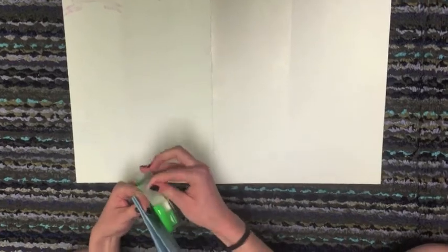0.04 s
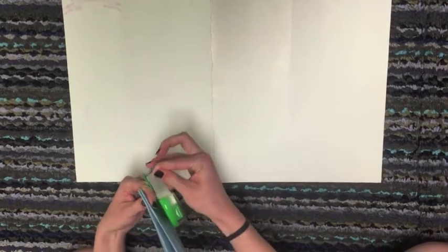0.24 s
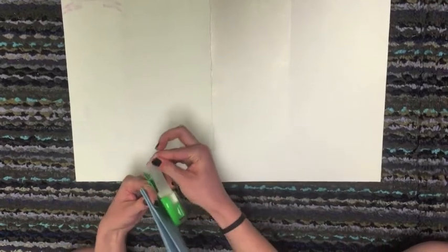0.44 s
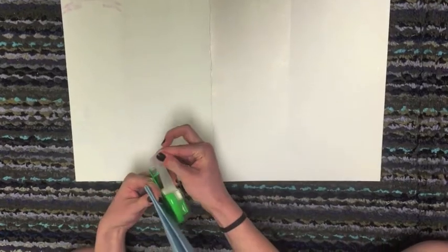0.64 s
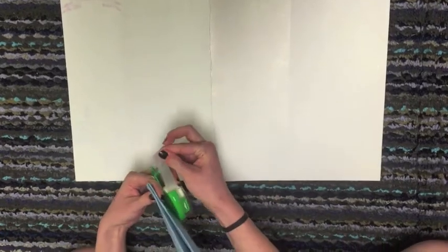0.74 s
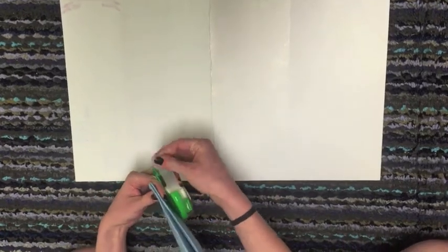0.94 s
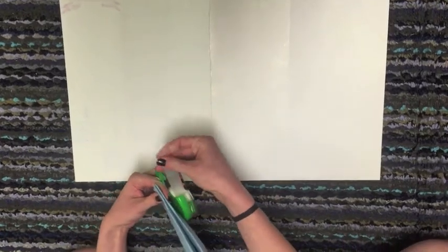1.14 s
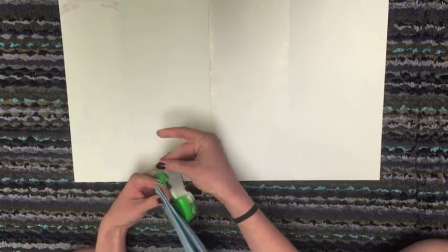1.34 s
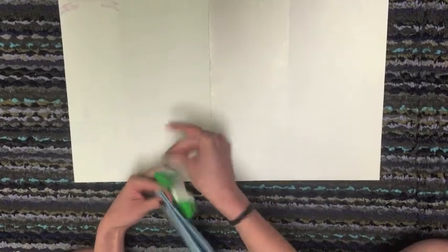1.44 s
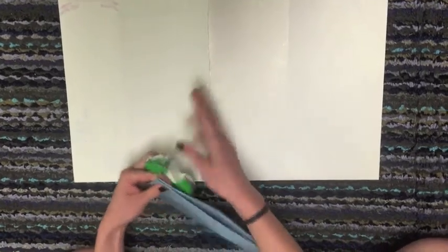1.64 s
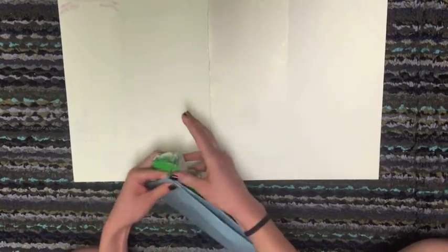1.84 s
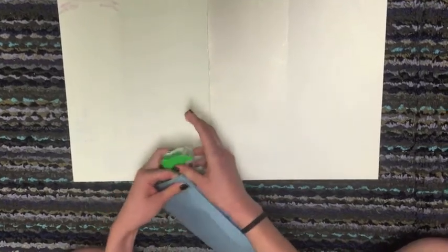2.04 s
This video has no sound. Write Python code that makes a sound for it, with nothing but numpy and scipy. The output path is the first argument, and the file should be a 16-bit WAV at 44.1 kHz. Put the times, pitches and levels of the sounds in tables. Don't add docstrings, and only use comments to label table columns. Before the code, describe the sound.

Adhesive tape lets go of its roll in sharp rattling jerks that ring a plastic shell briefly, then small ticks, a quick toothed rip and light paper handling, close-miked, with short room echo and low ventilation rumble.

```python
import sys
import numpy as np
from scipy import signal
from scipy.fft import rfft, irfft
from scipy.io import wavfile
from scipy.ndimage import map_coordinates

SR = 44100
rng = np.random.default_rng(int(sys.argv[2]) if len(sys.argv) > 2 else 0)


def voltage_ratio(level):
    return 10 ** (np.asarray(level, float) / 20)


def wav_out(sig):
    wavfile.write(sys.argv[1], SR, np.round(np.clip(np.atleast_2d(sig).T, -1, 1) * 32767).astype(np.int16))


N = 92610
LEAD = 4096


def rms_one(x):
    return x / np.sqrt(np.mean(x ** 2) + 1e-20)


def at_hz(points, hz):
    p = np.array(points)
    return np.interp(np.log(np.maximum(hz, 1)), np.log(p[:, 0]), p[:, 1])


def colour(x, points):
    hz = np.arange(len(x) // 2 + 1) * SR / len(x)
    return rms_one(irfft(rfft(x) * voltage_ratio(at_hz(points, hz)), len(x)))


def highpass(x, hz):
    return signal.sosfilt(signal.butter(3, hz, "high", fs=SR, output="sos"), x)


def ring(clicks, hz, t60):
    r = voltage_ratio(-60 / (t60 * SR))
    w = 2 * np.pi * hz / SR
    return signal.lfilter([0, np.sin(w)], [1, -2 * r * np.cos(w), r * r], clicks + 1e-18)


def drift(rate):
    knots = rng.standard_normal(200)
    return map_coordinates(knots, [np.arange(N) / SR * rate], order=3)


def crackle(per_s, spread_db):
    n = N + LEAD
    happens = rng.random(n) < per_s / SR
    size = voltage_ratio(spread_db * np.minimum(rng.exponential(1, n), 4))
    return happens * size * rng.choice([-1, 1], n)


def swells(rows):
    t = (np.arange(N + LEAD) - LEAD) / SR
    return sum(voltage_ratio(db) * np.exp(-((t - mid) / half) ** 2) for mid, half, db in rows)


# [t/s, level/dB]
AIR_FLOW = [(0.0, -54), (0.2, -60), (0.63, -59), (0.65, -70), (0.7, -54.5), (0.88, -64.5), (0.92, -54),
            (0.96, -66.5), (1.62, -55), (1.65, -67.5), (1.72, -56), (1.77, -65), (1.91, -57.5), (2.03, -68),
            (2.08, -56), (2.1, -59)]
# [f/Hz, level/dB per Hz]
RUMBLE_COLOUR = [(15, -54.5), (25, -26.5), (38, -12.5), (113, -1.5), (238, -13), (308, -12.5), (368, -28),
                 (681, -21.5), (1200, -28), (1560, -62), (2640, -120)]
# [f/Hz, width/Hz, level/dB]
DUCT_TONES = [(59, 8, -68), (82, 12, -72.5), (110, 9.2, -64), (159, 33, -72), (239, 20, -75.5),
              (305, 34, -69), (385, 25, -80), (680, 52, -79.5), (850, 50, -83.5)]
# [f/Hz, level/dB per Hz]
HISS_COLOUR = [(590, -36.5), (1000, -18), (1430, -3), (1550, -7), (1960, -8), (4210, -13), (13100, -19.5),
               (14900, -22.5), (16000, -38.5)]


def ventilation():
    s, flow_db = np.transpose(AIR_FLOW)
    gust_db = 0.8 * np.interp(np.arange(N) / SR, s, flow_db - flow_db.mean())
    air = colour(rng.standard_normal(N), list(RUMBLE_COLOUR)) * voltage_ratio(-65 + 2.0 * drift(11))
    for hz, width_hz, db in DUCT_TONES:
        tone = rms_one(ring(rng.standard_normal(N + SR), hz, 2.2 / width_hz)[SR:])
        follow_db = gust_db * min(1, 150 / hz)
        air += voltage_ratio(db + 3.0 * drift(7.94) + follow_db) * tone
    hiss = colour(rng.standard_normal(N), [(400, -58.5)] + list(HISS_COLOUR))
    return air + voltage_ratio(-75) * hiss


# [f/Hz, t/s]
ROOM_FADE = [(300, 0.16), (800, 0.25), (2100, .25), (5500, 0.24), (14600, 0.14)]
# [f/Hz, level/dB]
ROOM_TINT = [(200, 0.5), (700, 3), (1500, 1.5), (2500, 3), (4300, -4), (7000, -0.5), (15000, -7.5)]
# [delay t/s, level/dB]
NEAR_ECHOES = [(0.0119, -25.5), (.015, -24)]


def room(x):
    room_db, first_wall_s, build_s = -15, 0.00067, 0.0065
    t = np.arange(SR // 2) / SR
    edges = 150 * 2 ** np.arange(0, 7, .5)
    tail = 0
    for low, high in zip(edges, edges[1:]):
        hz = np.sqrt(low * high)
        sos = signal.butter(2, [low, high], "band", fs=SR, output="sos")
        band = signal.sosfilt(sos, rng.standard_normal(len(t)))
        tail = tail + band * voltage_ratio(at_hz(ROOM_TINT, hz) - 60 * t / at_hz(ROOM_FADE, hz))
    tail = tail * np.clip((t - first_wall_s) / build_s, 0, 1)
    tail *= voltage_ratio(room_db) / np.sqrt(np.sum(tail ** 2))
    for s, db in NEAR_ECHOES:
        tail[int(s * SR)] += voltage_ratio(db)
    return signal.fftconvolve(x, tail)[:len(x)]


# [middle t/s, half length t/s, level/dB]
PAPER_SLIDES = [
    (0.135, 0.014, -65),
    (0.182, 0.0052, -74.5),
    (1.044, 0.013, -72.5),
    (1.871, 0.015, -64),
    (1.965, 0.017, -70),
    (2.02, 0.027, -70.5),
    (1.45, 0.046, -74),
]
# [f/Hz, level/dB per Hz]
PAPER_COLOUR = [(300, -20.5), (1000, 0.5), (3000, -2.5), (6000, -5), (10000, -24), (16000, -34)]


def rustle():
    return swells(PAPER_SLIDES) * colour(crackle(4000, 2.2), PAPER_COLOUR)


# [middle t/s, half length t/s, level/dB]
TEETH = [
    (1.4825, 0.003, -54.5),
    (1.486, 0.0015, -49),
    (1.4905, 0.0018, -50.5),
    (1.4935, 0.0016, -41.5),
    (1.4975, 0.0036, -41.5),
    (1.5025, 0.0024, -46),
    (1.511, 0.0044, -48.5),
]
# [f/Hz, level/dB per Hz]
FIBRE_COLOUR = [(300, -9), (900, -18), (1500, -5), (2800, 2), (4500, -3), (7000, -7.5), (10000, -11.5),
                (15500, -22)]


def tear():
    return swells(TEETH) * colour(crackle(8200, 3.5), FIBRE_COLOUR)


# [t/s, peak level/dB, low patch f/Hz, high patch f/Hz, high patch level/dB]
SHEET_TICKS = [(0.1357, -43.5, 2730, 4180, 3.5), (0.7465, -57, 3700, 6100, 2), (.839, -53.5, 4100, 5800, 3),
               (1.035, -37.5, 3134, 4400, -1), (1.0345, -41, 6000, 8250, -2.5),
               (1.061, -51.5, 2600, 6000, 4), (1.121, -56.5, 4300, 6060, .5),
               (1.2211, -57.5, 3400, 6130, 3), (1.4187, -53, 1290, 3900, -9), (1.45, -48, 3160, 6560, -8),
               (1.465, -30.5, 3900, 6400, 1), (1.8425, -55, 5400, 6800, -4),
               (1.8603, -38.5, 2570, 4740, 5.5), (1.863, -41.5, 1290, 2000, 2),
               (1.8775, -55.5, 2500, 8000, -6), (1.9615, -40, 3900, 9600, -12.5)]


def ticks():
    out = np.zeros(N + LEAD)
    t = np.arange(900) / SR
    for s, db, low_hz, high_hz, high_db in SHEET_TICKS:
        burst = rng.standard_normal(len(t)) * np.exp(-t / .0015)
        low, high = [rms_one(ring(burst, hz, 10 / hz)) for hz in (low_hz, high_hz)]
        crack = rms_one(ring(burst, 9030, .0006))
        tick = highpass(low - voltage_ratio(high_db) * high + voltage_ratio(-10) * crack, 0.42 * low_hz)
        i = int(s * SR) + LEAD
        out[i:i + len(t)] += voltage_ratio(db - 2) * tick / abs(tick).max()
    return out


def grip(starts):
    hold_s, close_s, damped_db = .003, .0012, -12
    index = np.arange(N + LEAD)
    latest = np.maximum(np.searchsorted(starts, index, "right") - 1, 0)
    since = (index - starts[latest]) / SR
    return voltage_ratio(damped_db * np.clip((since - hold_s) / close_s, 0, 1))


# [t/s, peak level/dB, treble tilt/dB per octave, bass tilt/dB per octave]
JERKS = [
    (.2489, -10, 3, 4.6),
    (.2563, -7.5, -1, 4.6),
    (.2652, -12, 7, 16),
    (.2742, -10.5, 0.5, 12.2),
    (.3447, -10, -0.3, 0.4),
    (.3541, -9.5, 4, 0.9),
    (.4438, -9, 2.6, -3.3),
]
# [delay t/s, level/dB]
JERK_STEPS = [
    (0, 1),
    (.0005, -19.5),
    (.0011, 1.5),
    (.0019, -8),
    (.0027, -6.5),
]
# [f/Hz, level/dB, fade by 60 dB t/s]
SHELL_TONES = [(650, -50, .008), (1190, -21, 0.0085), (1500, -11, 0.0041), (2000, -13, 0.0057),
               (2600, -3.5, .006), (3185, -8.5, 0.016), (4300, -0.5, 0.0082), (5277, -18, 0.0017),
               (5760, -13, 0.009), (7040, -11, 0.0044), (8040, -15, 0.0067), (9770, -17, 0.0032),
               (11400, -23, 0.0033), (14430, -31.5, .003)]


def dispenser():
    earlier_jerk = (-0.027, -12.5, 11.5, .3)
    rows = np.array([earlier_jerk] + list(JERKS))
    delay, step_db = np.transpose(JERK_STEPS)
    at = ((rows[:, :1] + delay) * SR + LEAD).astype(int)
    out = np.zeros((2, N + LEAD))
    for k, (hz, db, t60) in enumerate(SHELL_TONES):
        clicks = np.zeros((2, N + LEAD))
        octaves = np.log2(hz / 4000)
        tilt_db = rows[:, 2:3] * max(octaves, 0) + rows[:, 3:] * min(octaves, 0)
        level_db = -6.5 + db + rows[:, 1:2] + tilt_db
        chance_db = -0.5 * rng.standard_normal(at.shape)
        clicks[0, at] = voltage_ratio(level_db + step_db + chance_db) * rng.choice([-1, 1], at.shape)
        clicks[1, at[:, 0]] = voltage_ratio(level_db[:, 0] + 9.5) * (-1) ** k
        out += [ring(clicks[0], hz, t60), ring(clicks[1], hz, t60 * 0.52)]
    out[0] *= grip(at[:, 0])
    return highpass(out, 447)


def scene():
    shell, all_round = dispenser()
    small = ticks() + tear() + rustle()
    hands = shell + small + room(all_round + small)
    return (hands[LEAD:] + ventilation())[None]


def band_limit(x):
    return signal.sosfilt(signal.butter(12, 16420, fs=SR, output="sos"), x)


def record(dry):
    dip_hz, dip_width_hz, dip_share = 10400, 500, .5
    b, a = signal.iirpeak(dip_hz, dip_hz / dip_width_hz, SR)
    x = dry - dip_share * signal.lfilter(b, a, dry)
    x = highpass(x, 46)
    x = signal.sosfilt(signal.cheby2(10, 40, 15500, fs=SR, output="sos"), x)
    return band_limit(x)


dry = scene()
out = record(dry)
wav_out(out)
```